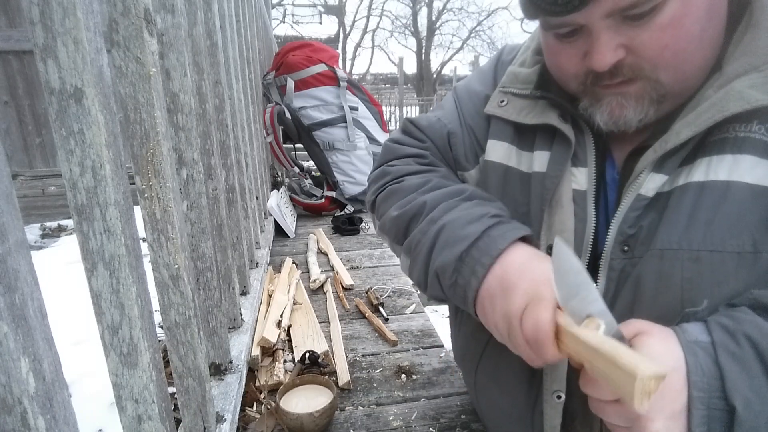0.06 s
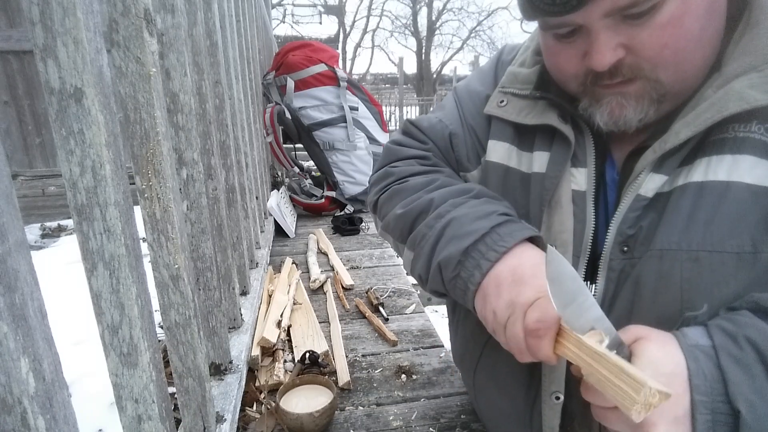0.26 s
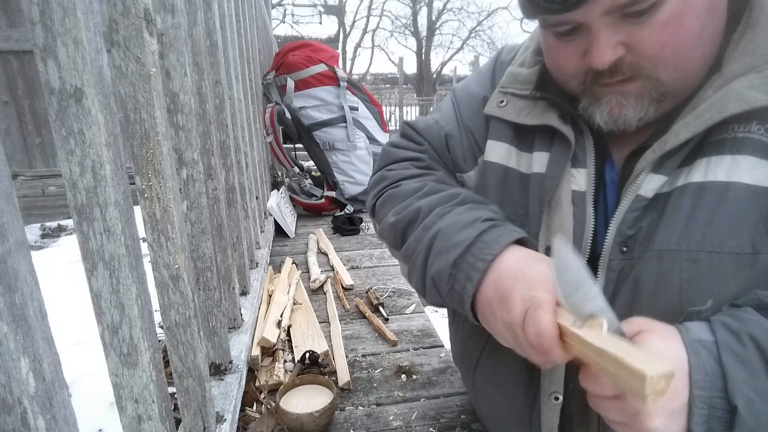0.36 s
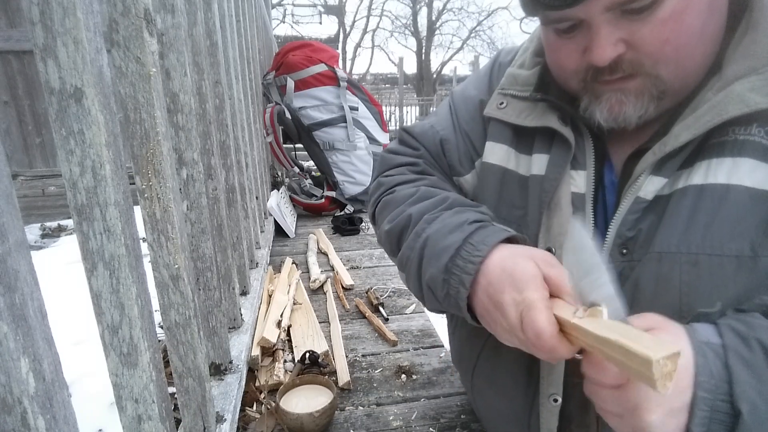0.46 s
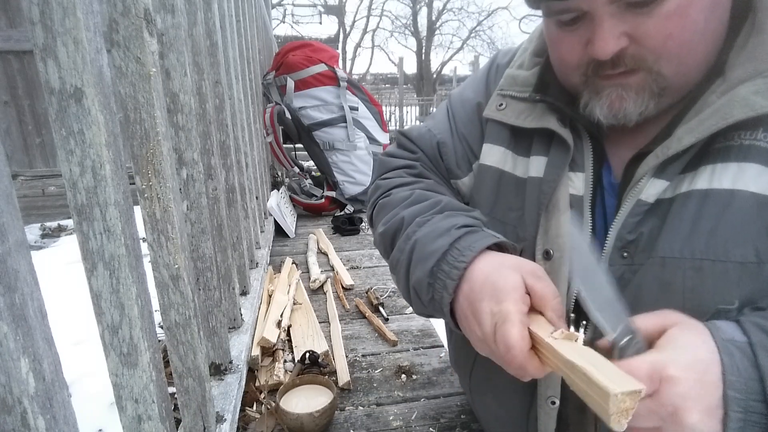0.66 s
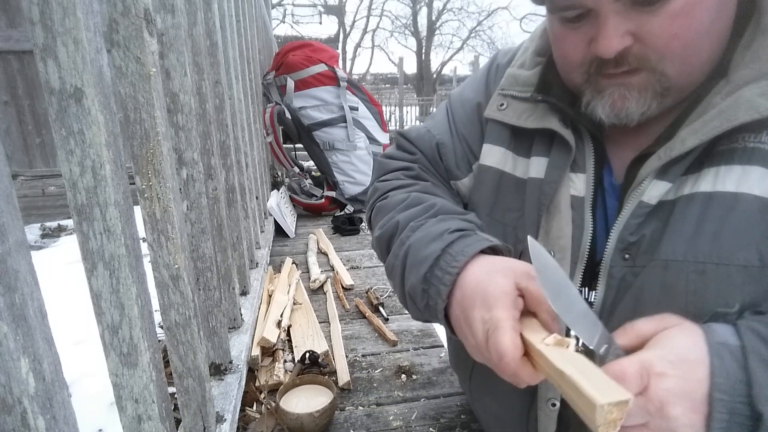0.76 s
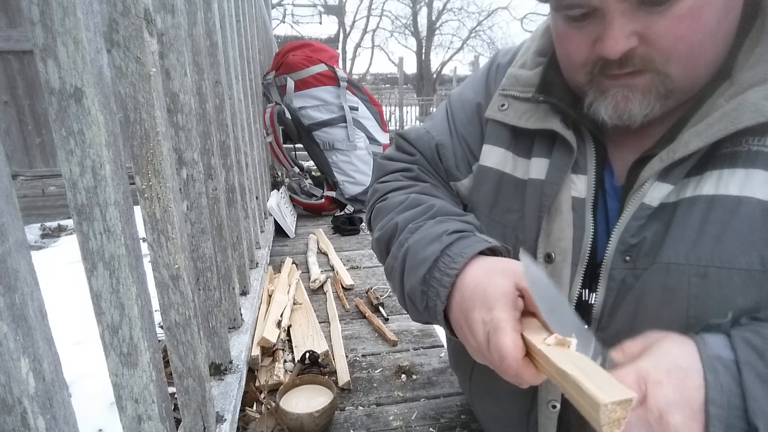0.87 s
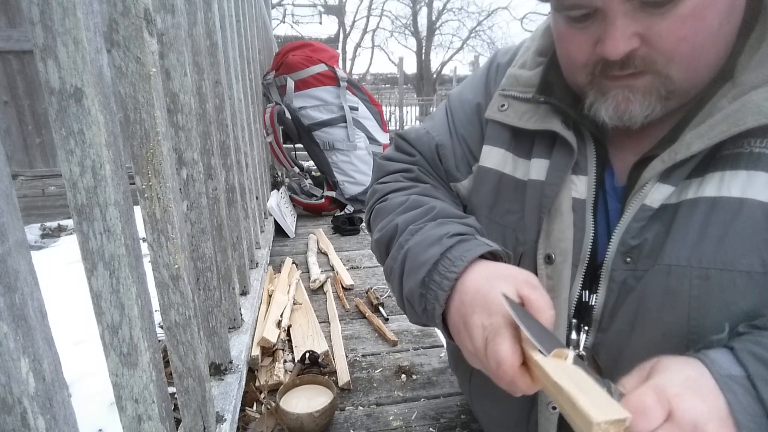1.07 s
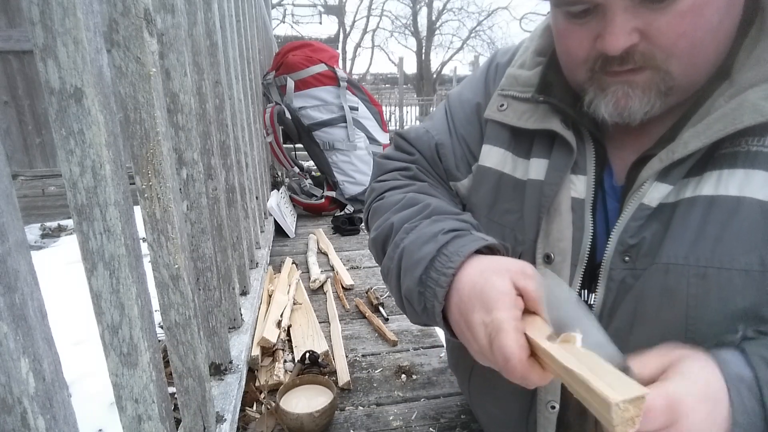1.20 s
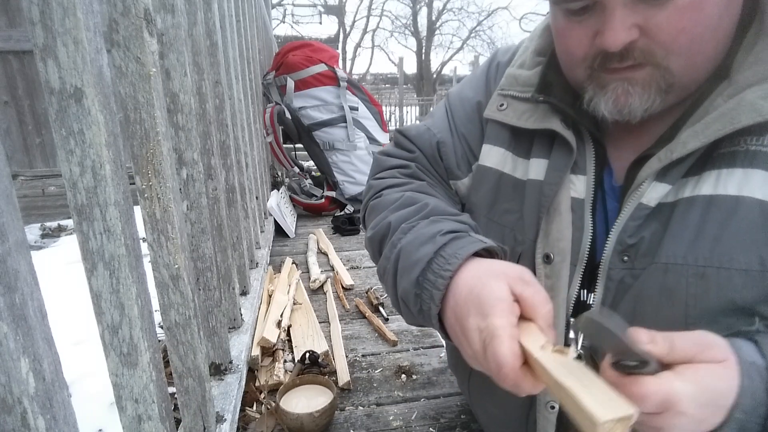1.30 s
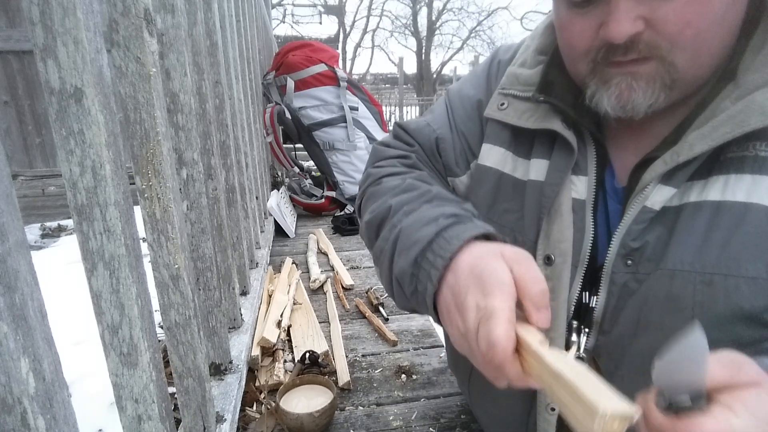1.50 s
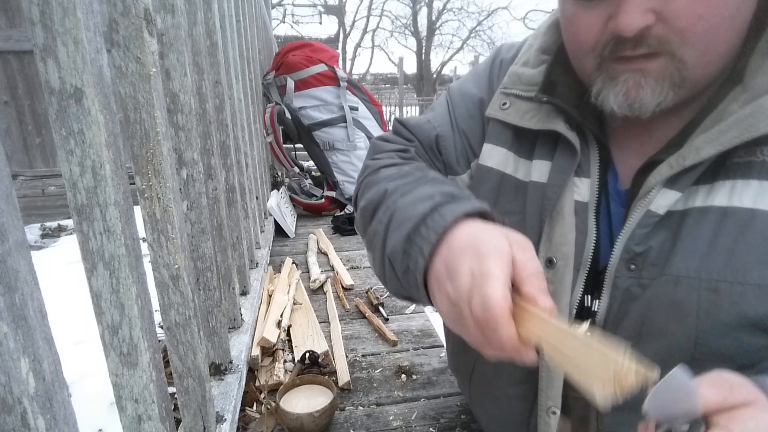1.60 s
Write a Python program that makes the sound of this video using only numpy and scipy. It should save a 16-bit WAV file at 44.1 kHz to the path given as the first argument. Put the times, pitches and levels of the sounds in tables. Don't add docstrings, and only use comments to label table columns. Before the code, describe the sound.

Wood creaks briefly and cracks hard near the start, then light blade taps and nylon swishes follow; quiet outdoor air with distant traffic and motor hum, close small stereo microphone with hissy, whistling highs.

```python
import sys
import numpy as np
from scipy import signal
from scipy.fft import rfft, irfft
from scipy.io import wavfile
from scipy.ndimage import uniform_filter1d

SR = 44100
rng = np.random.default_rng(int(sys.argv[2]) if len(sys.argv) > 2 else 0)


def voltage_ratio(level):
    return 10 ** (np.asarray(level, float) / 20)


def master(y):
    cut = np.clip(np.atleast_2d(y).T, -1, 1)
    pcm = np.round(cut * 32767)
    wavfile.write(sys.argv[1], SR, pcm.astype(np.int16))


N = 72765

# pitch_hz, level_db, t60_s
STICK_MODES = [(390, -13, .03), (710, -8, .022), (1290, -12, .022), (1890, -17, .065), (2200, -6, .009),
               (2500, -1, .008), (3800, -12, .006), (4800, -13, .005), (5600, -12, .005), (6800, -4, .007),
               (8200, -10, .006)]
LEFT_LATE_S = .0001


def level(x, db):
    return x * voltage_ratio(db) / np.sqrt(np.mean(x ** 2))


def colour(x, points):
    hz, db = np.array(points).T
    size = 8192
    bins_hz = np.fft.rfftfreq(size, 1 / SR)
    log_gain = np.interp(np.log(bins_hz + 1), np.log(hz), db) * np.log(10) / 20
    cepstrum = irfft(log_gain)
    cepstrum[1:size // 2] *= 2
    cepstrum[size // 2 + 1:] = 0
    response = irfft(np.exp(rfft(cepstrum)))
    return signal.fftconvolve(x, response[None])[..., :N]


def ring(x, hz, t60):
    radius = np.exp(-np.log(1000) / (t60 * SR))
    angle = 2 * np.pi * hz / SR
    return signal.lfilter([0, np.sin(angle)], [1, -2 * radius * np.cos(angle), radius ** 2], x)


def walk(rate_hz):
    hold = int(SR / rate_hz)
    steps = np.repeat(rng.standard_normal(N // hold + 1), hold)
    smooth = uniform_filter1d(uniform_filter1d(steps, hold), hold)
    return 1.49 * smooth[:N]


def pan(db):
    return voltage_ratio(np.array([db / 2, -db / 2]))


def grains(shape, per_s, scatter_db):
    present = rng.random(shape) < per_s / SR
    size = voltage_ratio(scatter_db * rng.exponential(size=shape))
    return present * rng.standard_normal(shape) * size


def at_both_ports(x):
    return np.array([np.roll(x, int(LEFT_LATE_S * SR)), x])


def town():
    # pitch_hz, level_db
    rumble = [(20, 3.5), (55, -1.5), (160, -6), (420, -13.5), (700, -25), (1400, -32.5), (2250, -40),
              (3500, -46)]
    alike_hz, swell_db = 600, 1.5
    hz = np.fft.rfftfreq(N, 1 / SR)
    alike = 1 / (1 + (hz / alike_hz) ** 1.42)
    mid, side = rfft(rng.standard_normal((2, N)))
    mid = mid * np.sqrt(1 + alike)
    side = side * np.sqrt(1 - alike)
    both = np.array([mid + side, mid - side])
    out = 0
    for octave in range(9):
        band = np.clip(1 - np.abs(np.log2(hz / 30 + 1e-9) - octave), 0, 1)
        out = out + irfft(both * np.sqrt(band), N) * voltage_ratio(swell_db * walk(3))
    return level(colour(out, rumble), -51) * pan(-2)[:, None]


def road():
    # pitch_hz, level_db
    murmur = [(500, -24), (850, 1), (1250, -1.5), (1700, -29.5), (2000, -9), (2250, -3), (2550, -15.5),
              (3200, -16.5)]
    # start_s, level_db
    traffic = [
        (0, -60.5),
        (.28, -63),
        (.45, -68.5),
        (.7, -63.5),
        (.9, -65.5),
        (1.2, -68),
        (1.65, -71.5),
    ]
    mid, side = rng.standard_normal((2, N))
    both = np.array([mid + .7 * side, mid - .7 * side])
    edged = [(60, -50)] + murmur + [(6000, -50)]
    s, db = np.array(traffic).T
    swell_db = np.interp(np.arange(N) / SR, s, db) + 1.5 * walk(12)
    return level(colour(both, edged), 0) * voltage_ratio(swell_db)


def hum():
    hum_hz, hum_db, octave_db = 191.45, -53.5, -17
    phase = 2 * np.pi * np.cumsum(hum_hz * (1 + .0007 * walk(3))) / SR
    tone = np.sin(phase) + voltage_ratio(octave_db) * np.sin(2 * phase)
    return np.sqrt(2) * tone * voltage_ratio(hum_db + 1.0 * walk(4)) * pan(-2.5)[:, None]


def jacket():
    # start_s, level_db, left_right_db
    moves = [(0, -54.5, -12.5), (0.059, -50.5, -6.5), (.15, -63, -14), (.22, -46, -11), (.29, -63.5, -4),
             (.34, -51, -12.5), (.45, -56.5, -10), (.76, -53, -6.5), (.94, -62, -10), (1.17, -59.5, -7),
             (1.23, -48.5, -4), (1.295, -51.5, -6), (1.332, -40, 0.5), (1.386, -37.5, -6),
             (1.409, -50.5, -8.5), (1.49, -56, -10), (1.565, -52.5, -6), (1.65, -56.5, -7.5)]
    # pitch_hz, level_db
    nylon = [(600, -3), (2000, 0.5), (4000, 0.5), (8000, -1.5), (16000, -2.5)]
    cloth_db, flutter_db = -17, 1.5
    s, db, left_right_db = np.array(moves).T
    t = np.arange(N) / SR
    crinkle = level(grains((2, N), per_s=3000, scatter_db=2.0), -5)
    cloth = rng.standard_normal((2, N)) + crinkle
    flutter = flutter_db * (walk(41) + 0.41 * np.array([walk(22.16), walk(25.6)]))
    gain = voltage_ratio(cloth_db + np.interp(t, s, db) + flutter)
    return colour(cloth, nylon) * gain * pan(np.interp(t, s, left_right_db))


def creak():
    # start_s, level_db, pitch_hz
    pry = [
        (.165, -69, 346),
        (0.193, -46, 356),
        (.21, -47.5, 330),
        (0.224, -49.5, 340),
        (0.234, -43.5, 750),
        (0.251, -50.5, 600),
        (0.266, -54, 500),
    ]
    slips_per_s, ring_s = 1600, 0.0068
    s, db, hz = np.array(pry).T
    t = np.arange(N) / SR
    slips = level(grains(N, slips_per_s, scatter_db=1.3), 0)
    pitch = np.interp(t, s, hz)
    out = np.zeros(N)
    for mode_hz, _, _ in STICK_MODES[:3]:
        nearness = voltage_ratio(-14 * np.abs(np.log2(mode_hz / pitch)))
        out += level(ring(slips, mode_hz, ring_s), 0) * nearness
    out = signal.lfilter(*signal.butter(2, 220, "high", fs=SR), out)
    out = out * voltage_ratio(np.interp(t, s, db, -120, -120))
    return at_both_ports(out) * pan(2.0)[:, None]


def scrapes():
    # start_s, length_s, level_db, pitch_hz, left_right_db
    strokes = [(0.171, 0.017, -81, 11600, -2), (.194, 0.0017, -60.5, 11800, -9),
               (0.199, 0.0081, -76, 10500, 7), (0.217, 0.002, -59, 10200, -9),
               (0.2261, 0.0013, -62.5, 11000, 0), (0.2302, 0.0053, -51, 9430, -12),
               (0.235, 0.0099, -68, 11200, -0.5), (0.614, 0.011, -81, 12900, 1.5),
               (1.046, 0.0039, -71, 12900, -14), (1.092, .022, -72, 14100, -13.5),
               (1.15, 0.012, -73, 13400, -15), (1.161, 0.0053, -66, 14300, -10),
               (1.198, 0.0019, -68.5, 12100, -13), (1.428, 0.0027, -61, 10200, -17.5),
               (1.569, 0.0091, -72.5, 11100, -3)]
    ring_s, broad_db, rise_s, fade_s = .0016, -3, .0006, .001
    size = 2400
    t = np.arange(size) / SR
    out = np.zeros((2, N))
    for s, length, db, hz, left_right_db in strokes:
        slips = rng.standard_normal((2, size)) * voltage_ratio(1.5 * rng.exponential(size=(1, size)))
        env = np.clip(t / rise_s, 0, 1) * np.exp(-np.clip(t - length, 0, None) / fade_s)
        squeak = level(ring(slips, hz, ring_s), 0) + level(slips, broad_db)
        burst = voltage_ratio(db) * pan(left_right_db)[:, None] * env * squeak
        i = int(s * SR)
        out[:, i:i + size] += burst[:, :N - i]
    return out


def knocks():
    # start_s, level_db, pitch_hz, t60_s
    hits = [(0.15, -49.5, 335, 0.018), (0.24, -33.5, 255, 0.023), (0.2344, -35.5, 1120, 0.014),
            (0.28, -50.5, 4100, 0.0018), (.1955, -56, 3700, 0.0025), (1.430, -39.5, 3100, 0.0044),
            (1.4304, -46.5, 1400, 0.011), (0.71, -47.5, 3200, 0.0054), (1.047, -42.5, 416, 0.037),
            (1.1634, -30.5, 387, 0.013), (1.1638, -48.5, 990, 0.019), (1.1627, -52.5, 2140, 0.019),
            (1.431, -42, 2260, 0.016), (1.4325, -50.5, 1800, 0.02), (1.433, -50, 690, .03)]
    push_cycles = 0.6
    out = np.zeros(N)
    for s, db, hz, t60 in hits:
        width = max(int(push_cycles * SR / hz), 2)
        push = np.zeros(4000)
        push[:width] = -np.hanning(width + 2)[1:-1] * 2 / width
        i = int(s * SR)
        out[i:i + 4000] += voltage_ratio(db + 3) * ring(push, hz, t60)
    return at_both_ports(out)


def snap():
    # start_s, left_level_db, right_level_db
    fibres = [(.3127, -44, -34), (.3134, -36, -21), (.3138, -32, -23), (.3142, -28, -26), (.3145, -29, -20),
              (.3149, -25, -26), (.3153, -27, -26), (.3159, -29, -29), (.3163, -35, -24), (.3171, -37, -30),
              (.3186, -40, -34), (.3205, -42, -40)]
    break_s, break_db, splinter_db = .31325, -19, -4
    crack_db, crack_ms = 4, .04
    low_hz, top_hz = 260, 7900
    size = 32
    fade = np.exp(-np.arange(size) / SR * 1000 / crack_ms)
    crack, jolt, main = np.zeros((2, N)), np.zeros(N), np.zeros(N)
    for s, left_db, right_db in fibres:
        i = int(s * SR)
        noise = rng.standard_normal((2, size))
        burst = noise * fade
        burst = burst / np.linalg.norm(burst, axis=1, keepdims=True)
        crack[:, i:i + size] += voltage_ratio(np.array([[left_db], [right_db]])) * burst
        jolt[i] += voltage_ratio(right_db + splinter_db) * np.sign(noise[1, -1])
    main[int(break_s * SR)] = -voltage_ratio(break_db)
    body = np.zeros(N)
    for hz, db, t60 in STICK_MODES:
        shake = jolt * min(hz / 4000, 1) ** 2
        body += voltage_ratio(db) * ring(main + shake, hz, t60)
    body = signal.sosfilt(signal.butter(2, low_hz, "high", fs=SR, output="sos"), body)
    body = signal.sosfilt(signal.butter(6, top_hz, fs=SR, output="sos"), body)
    return voltage_ratio(crack_db) * crack + at_both_ports(body)


def porch(x):
    echo_t60_s, echo_db, first_echo_s = .03, -16, .001
    t = np.arange(SR // 10) / SR
    tail = rng.standard_normal((2, len(t))) * voltage_ratio(-60 * t / echo_t60_s) * (t > first_echo_s)
    tail = tail / np.sqrt(np.sum(tail ** 2, 1, keepdims=True))
    return x + voltage_ratio(echo_db) * signal.fftconvolve(x, tail, axes=1)[:, :N]


def scene():
    background = town() + road() + hum()
    stick = creak() + scrapes() + knocks() + snap()
    return background + jacket() + porch(stick)


def low_pass(x):
    return signal.sosfilt(signal.butter(12, 16470, fs=SR, output="sos"), x)


def record(dry):
    # pitch_hz, level_db
    left_port = [(3000, 0), (7400, -2), (9000, 19), (10000, 33.5), (10900, 26), (13000, 31), (14500, 9),
                 (16000, 13)]
    right_port = [(3000, -0.5), (5500, 0.5), (8400, -10.5), (10200, 11.5), (12000, 26), (13300, 9),
                  (14500, 23), (16000, -3)]
    top_hz = 15850
    heard = np.concatenate([colour(dry[:1], left_port), colour(dry[1:], right_port)])
    heard = signal.sosfilt(signal.ellip(10, .3, 70, top_hz, fs=SR, output="sos"), heard)
    return low_pass(heard)


dry = scene()
out = record(dry)
master(out)
```